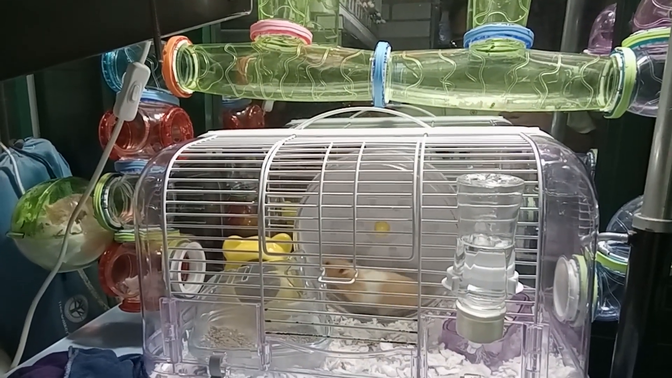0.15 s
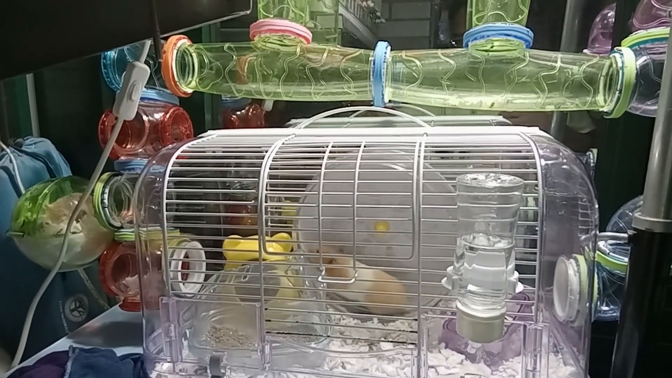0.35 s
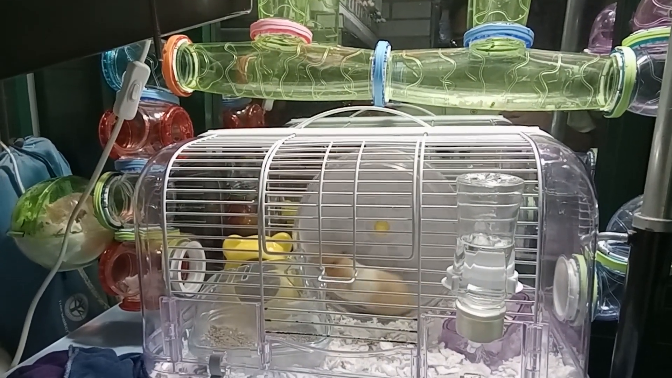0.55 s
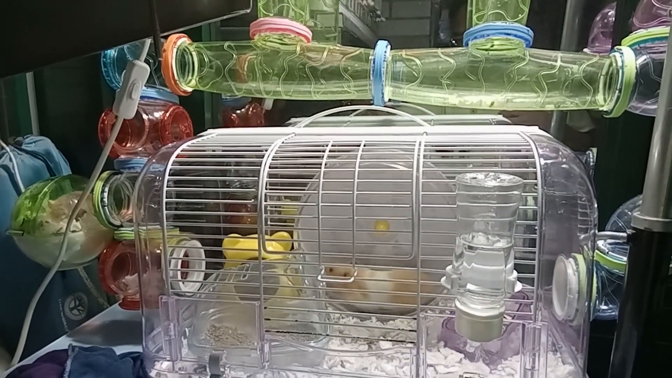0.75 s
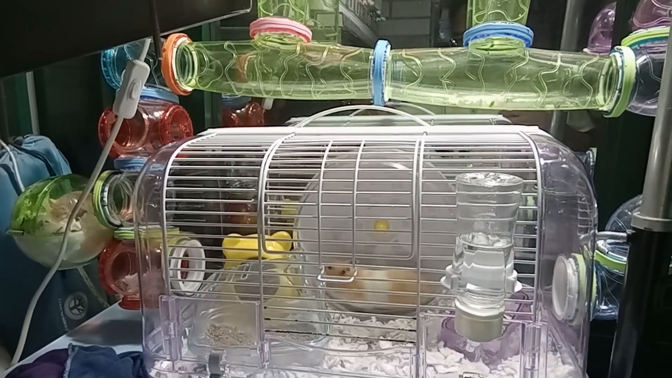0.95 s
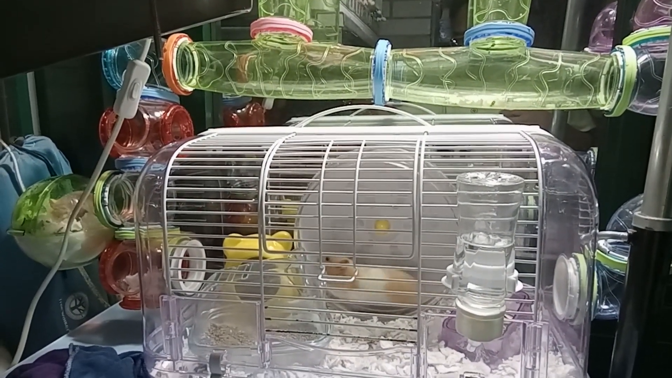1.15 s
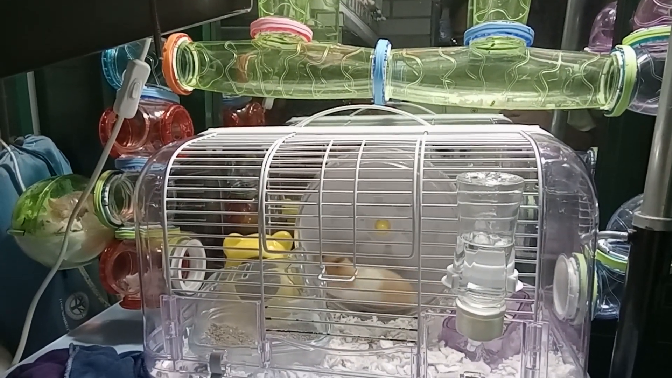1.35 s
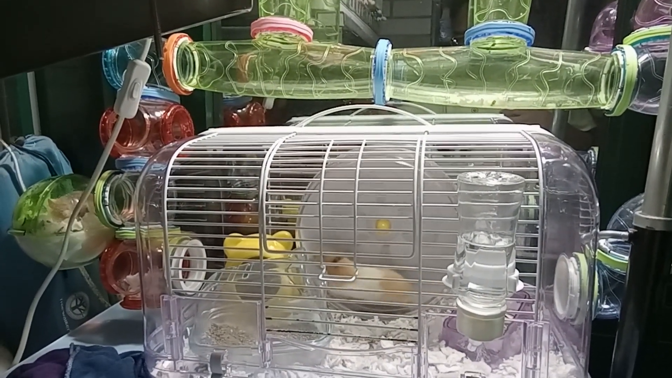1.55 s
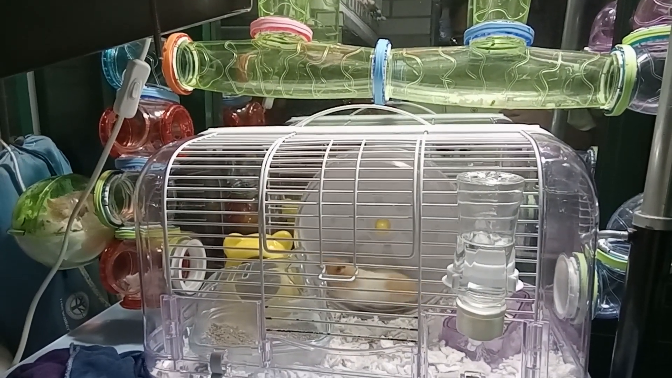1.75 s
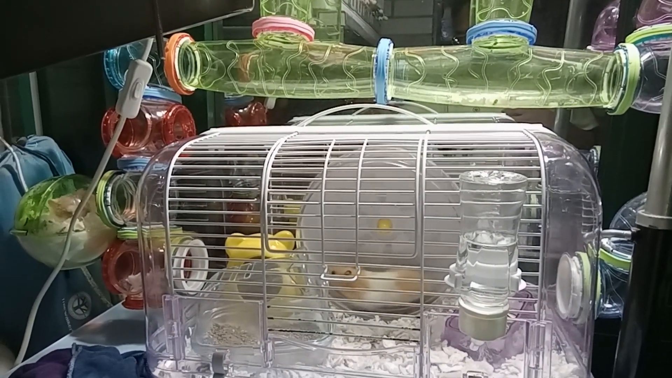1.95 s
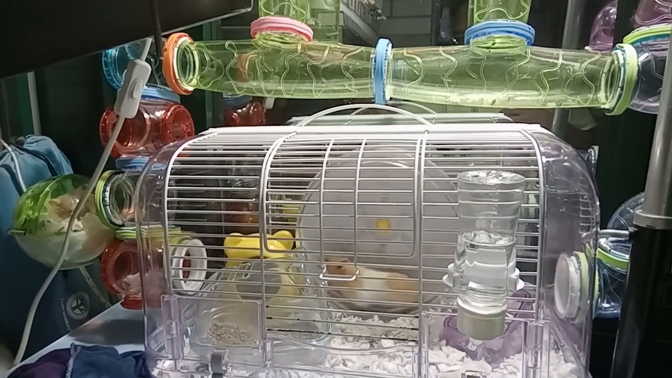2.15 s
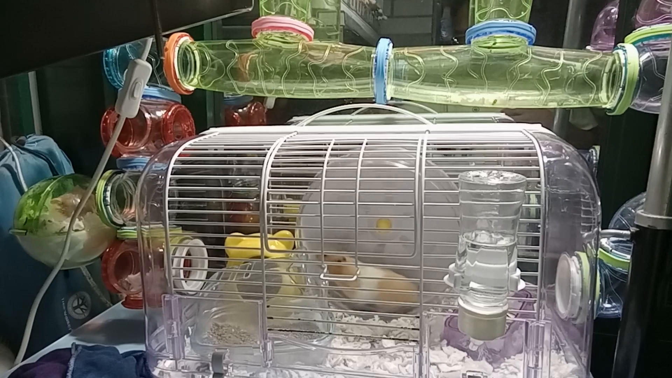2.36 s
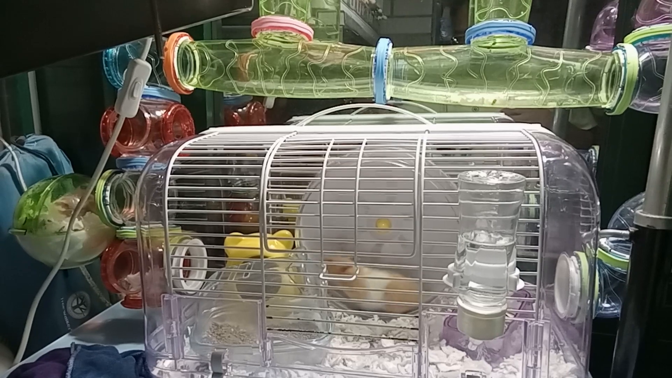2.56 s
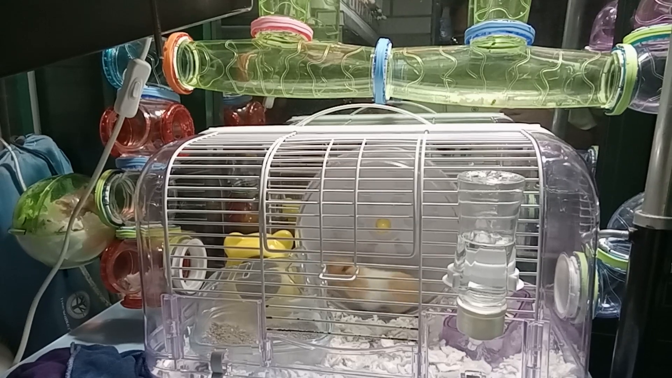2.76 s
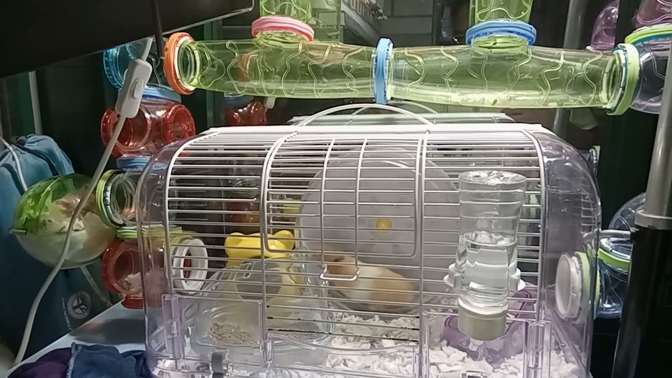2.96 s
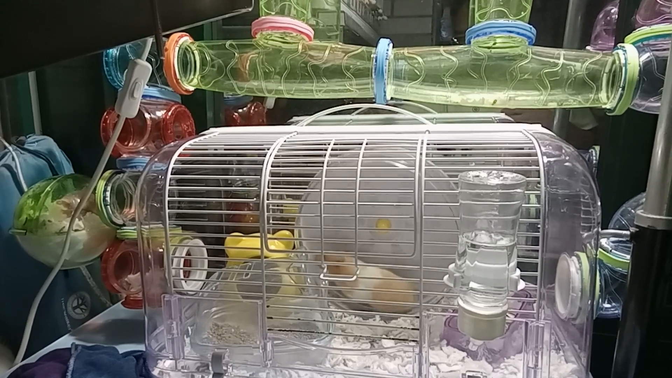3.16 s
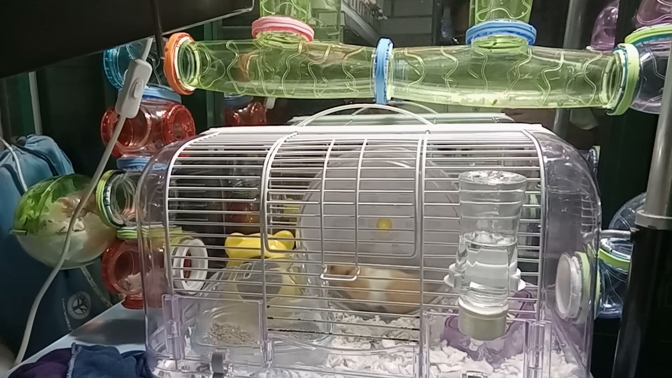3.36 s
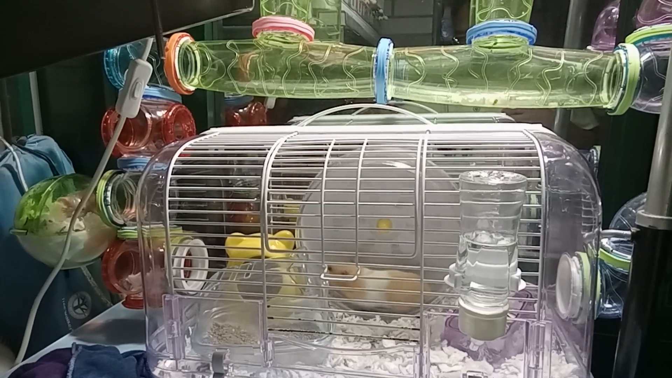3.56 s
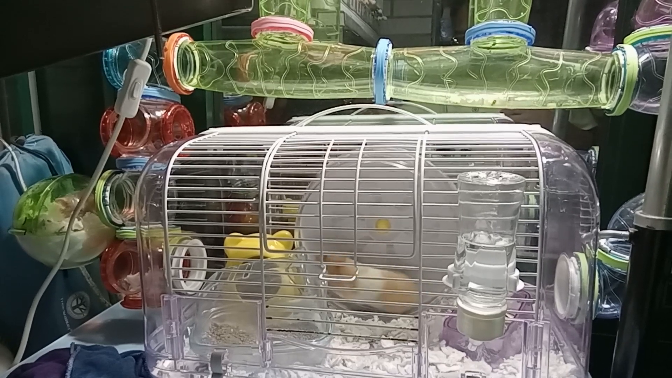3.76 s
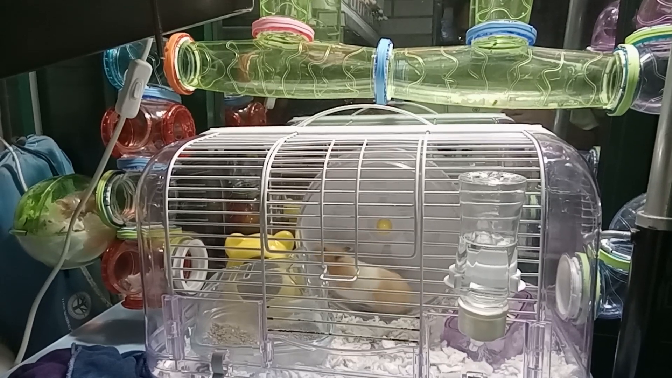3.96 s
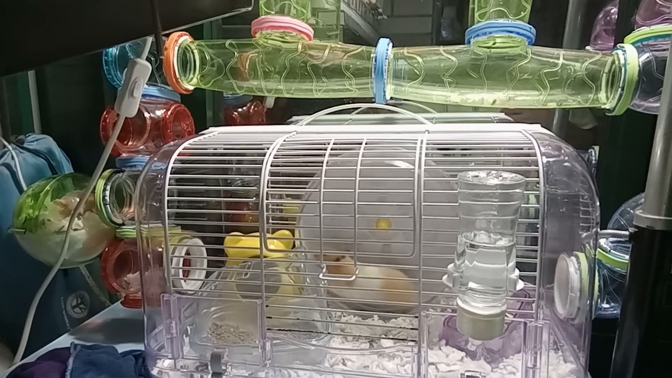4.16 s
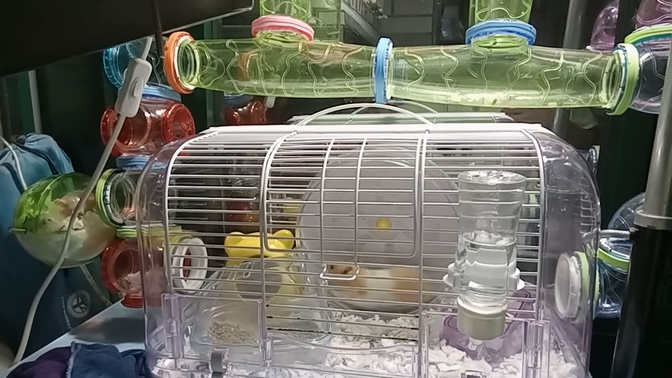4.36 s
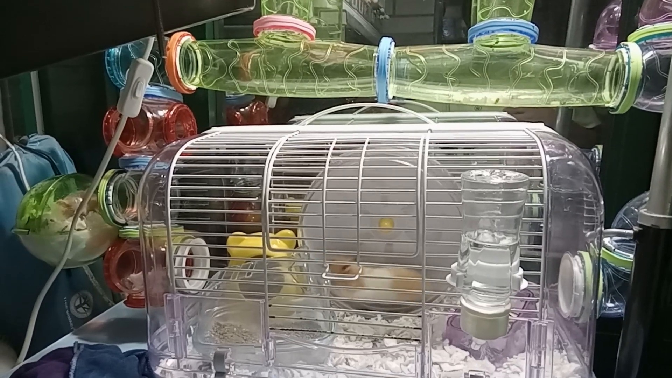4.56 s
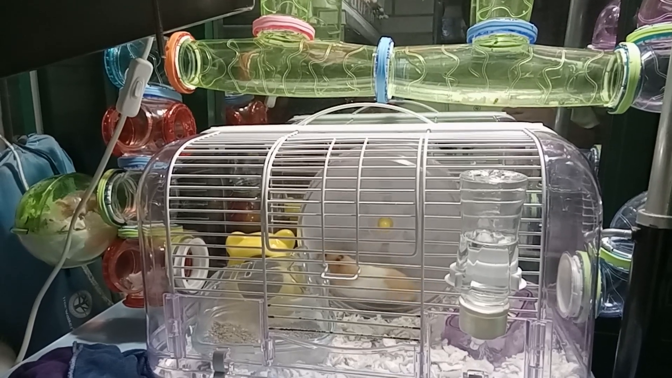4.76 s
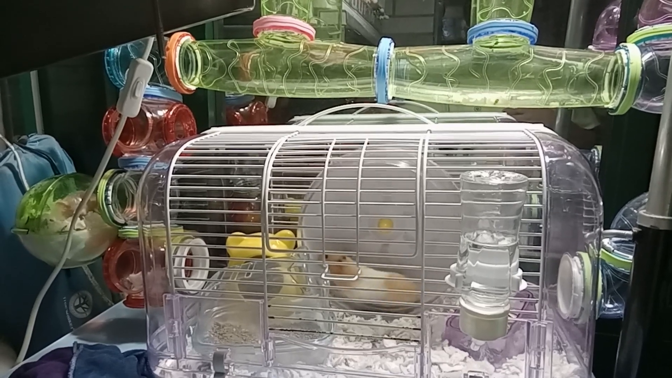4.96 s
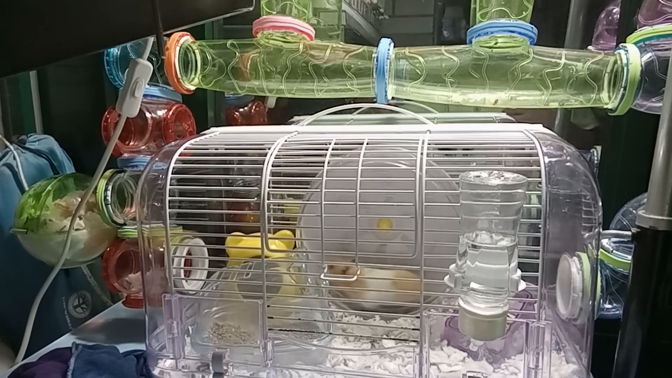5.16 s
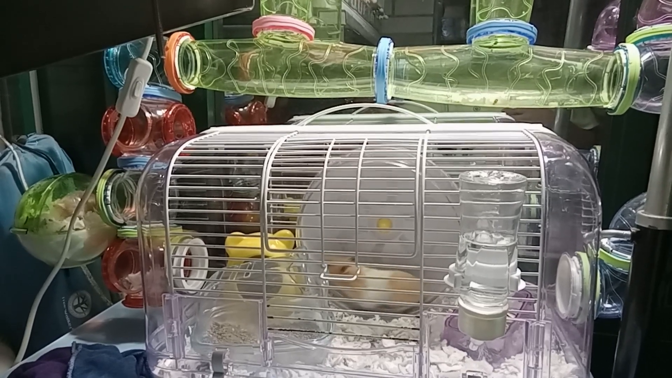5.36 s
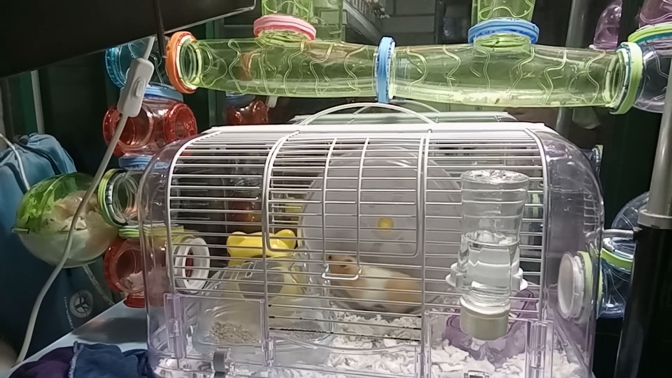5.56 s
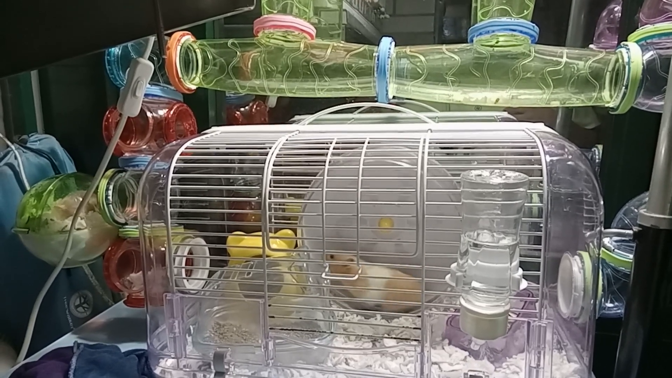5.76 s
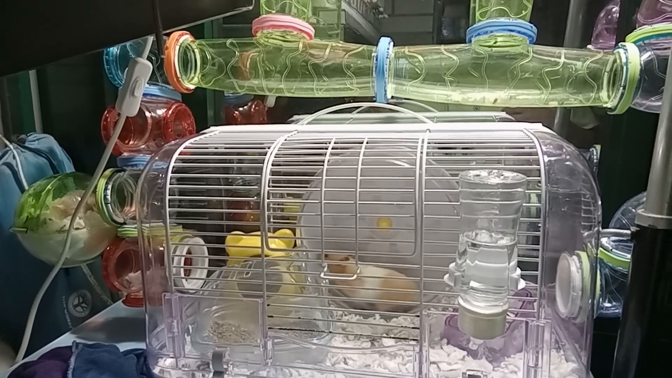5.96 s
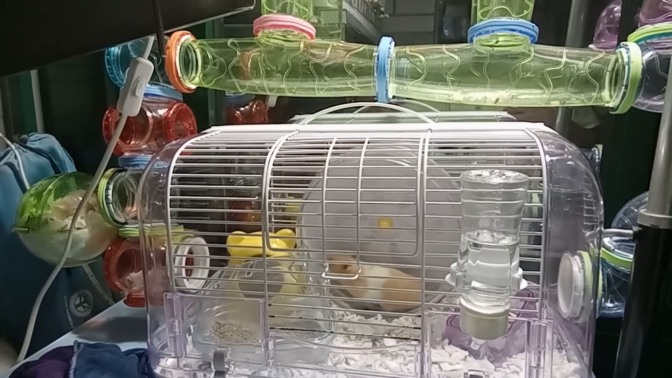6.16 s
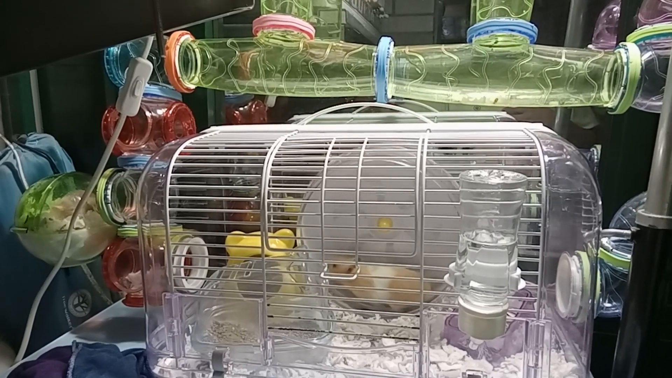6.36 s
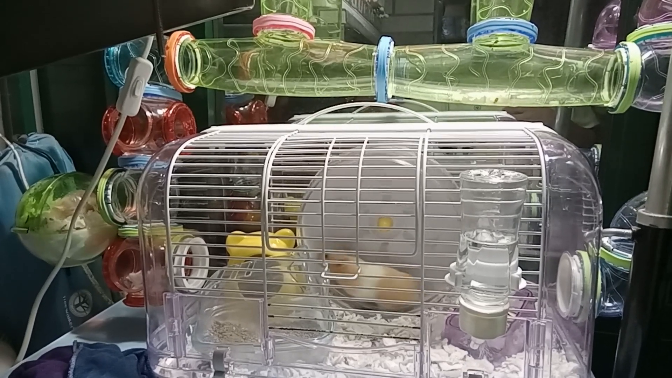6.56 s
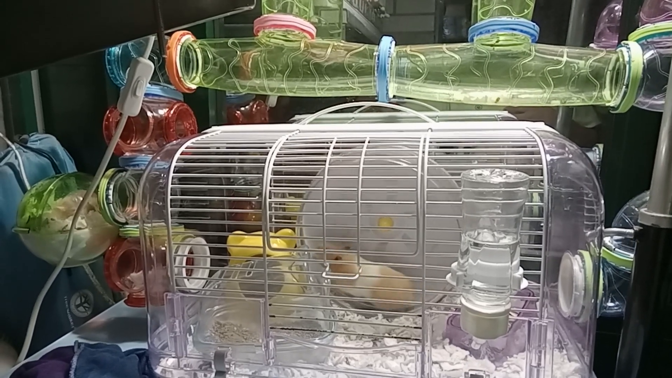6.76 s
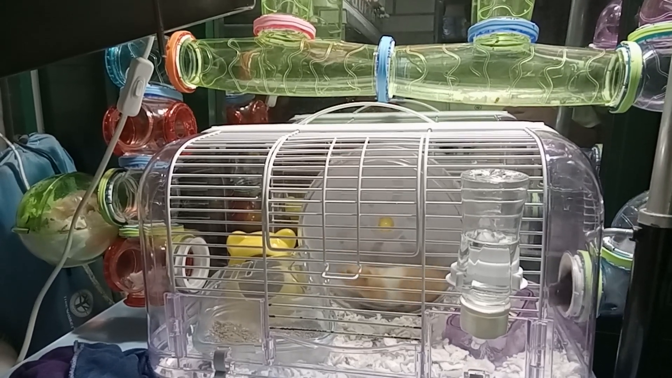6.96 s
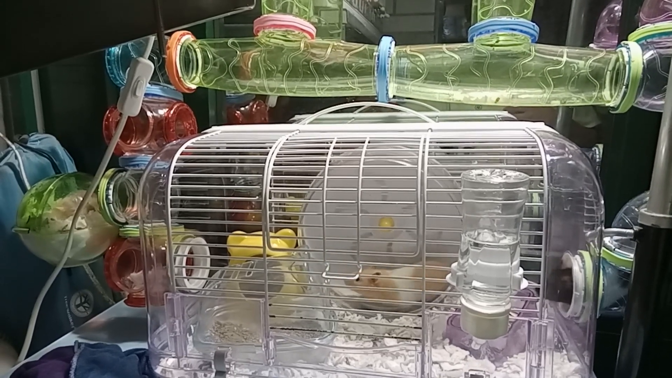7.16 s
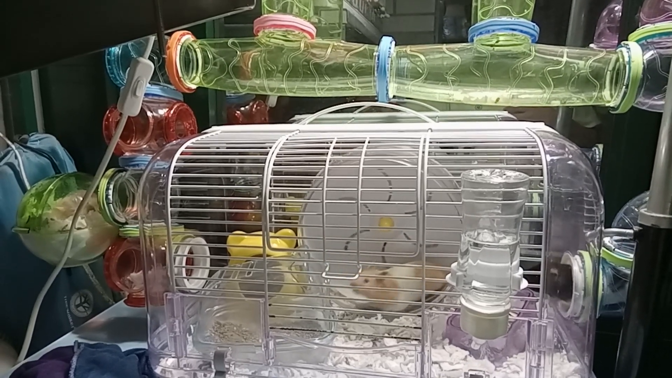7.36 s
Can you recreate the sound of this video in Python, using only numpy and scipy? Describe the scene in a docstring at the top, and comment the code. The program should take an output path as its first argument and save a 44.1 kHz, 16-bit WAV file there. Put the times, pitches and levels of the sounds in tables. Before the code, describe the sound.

Fast, uneven plastic clatter of a small rodent's exercise wheel knocking on its axle in a wire cage, then abruptly ceasing.

```python
"""A small room, with a wire and plastic cage in it where a hamster runs in a plastic wheel; one microphone channel.
Each footfall throws the loose wheel against its axle: a thud of the cage, a clack of the drum, a sharp tick,
then a weaker rebound. These are noise echoes with quick decays over a slower tail, shaped by resonances.
Between them the drum chatters in short runs, the axle pings and the rolling wheel rumbles with small taps.
Near the end the footfalls cease and the rumble sinks into the filtered noise of the quiet room."""
import sys
import numpy as np
from scipy import signal
from scipy.io import wavfile

SR = 44100
rng = np.random.default_rng(int(sys.argv[2]) if len(sys.argv) > 2 else 0)


def bounce(signal):
    """Save signal as a 16-bit WAV file at the path given by the first command-line argument."""
    frames = np.transpose(np.atleast_2d(signal))
    limited = np.clip(frames, -1, 1)
    pcm = np.round(limited * 32767).astype(np.int16)
    wavfile.write(sys.argv[1], SR, pcm)


N = 327209

# Levels in the tables are relative: each source sets its own balance on top of them.
# Air of the room. Each row: frequency in Hz, level in dB per Hz.
AIR_SPECTRUM = [(25, -18), (60, -30), (110, 9), (170, 0), (450, -37), (700, -15), (1400, -32), (3300, -29),
                (4000, -20.5), (5000, -41), (7000, -30), (8500, -39), (10000, -38), (16000, -37)]
# Rumble of the turning wheel, straight between points. Each row: time in seconds, level in dB.
ROLLING_LEVEL = [(0, -40), (.3, -47.5), (.8, -48), (1.45, -54.5), (2.3, -47.5), (3.4, -45.5), (4.3, -57.5),
                 (4.7, -44.5), (5.1, -48.5), (6.25, -47.5), (6.86, -50), (7.2, -49.5), (7.32, -58)]
# Spells in which the drum chatters. Each row: start in seconds, length in seconds, level in dB.
CHATTER_SPELLS = [(0, 0.14, -37), (0.715, 0.084, -38), (0.997, 0.045, -37.5), (1.185, 0.14, -41.5),
                  (1.658, 0.043, -37.5), (1.851, 0.12, -37), (2.461, 0.018, -37.5), (2.567, 0.04, -38),
                  (2.87, 0.054, -37), (3.156, 0.076, -36.5), (3.787, 0.058, -35), (4.101, 0.051, -40.5),
                  (4.283, .16, -36.5), (5.036, 0.077, -41), (6.35, 0.073, -43), (6.926, 0.088, -38.5)]
# The drum under a light bounce. Each row: frequency in Hz, level in dB per Hz.
BOUNCE_SPECTRUM = [(60, -31), (300, -6), (520, -20), (635, -8.5), (760, -1), (1300, -0.5), (2000, 0.5),
                   (2600, -3.5), (3300, -8), (4200, -14), (7000, -15.5), (16000, -53.5)]
# Low modes of the cage and its stand. Each row: frequency in Hz, width in Hz, level in dB.
CAGE_MODES = [(68.6, 5.4, -5), (88, 3.4, -18.5), (124.4, 11.6, -1), (128, 7.6, -10), (181.8, 5.8, 1.5),
              (230.5, 23.6, -5), (299.7, 31, -5), (338.7, 16, 2), (453, 35, -7), (487, 34, -5.5),
              (521.5, 6.1, -7)]
# Blows that set the axle ringing. Each row: start in seconds, level in dB, pitch in Hz.
AXLE_PINGS = [(1.159, -29.5, 5160), (1.827, -32, 5200), (3.613, -34, 5010), (4.274, -33, 5270),
              (4.358, -30, 5060), (5.474, -33.5, 5220), (6.341, -32, 5140), (6.9145, -27, 5150)]
# Modes of the axle. Each row: multiple of the pitch, width in Hz, level in dB.
AXLE_MODES = [(1, 190, 6), (.975, 260, -2), (1.974, 340, -7.5)]
# Footfalls that knock the wheel against its axle, about eleven a second.
# Each row: start in seconds, tick level in dB, clack level in dB.
FOOTFALLS = [(0.0014, -34, -30), (0.0204, -29, -29.5), (0.0479, -30, -33.5), (0.155, -23, -31),
             (0.2374, -29, -32), (0.3477, -31.5, -34), (0.4057, -50, -38), (0.5174, -20, -26),
             (0.5825, -26.5, -28.5), (0.6907, -19.5, -26.5), (0.7672, -29, -34), (0.8961, -34, -35.5),
             (0.9794, -19.5, -29), (1.076, -21.5, -26), (1.1565, -22.5, -29), (1.2479, -19.5, -28.5),
             (1.332, -36, -37), (1.4542, -35, -36), (1.5376, -30, -34), (1.6429, -21, -27.5),
             (1.7384, -34, -34), (1.8253, -19.5, -26.5), (1.9071, -22.5, -29), (2.0374, -47, -41.5),
             (2.0954, -25.5, -29.5), (2.2082, -33.5, -40), (2.2773, -34.5, -36.5), (2.3817, -22.5, -26.5),
             (2.4589, -32, -33), (2.5602, -20.5, -27), (2.636, -35.5, -38), (2.6862, -33.5, -43.5),
             (2.788, -33, -35), (2.8642, -22, -31), (2.9699, -25, -28.5), (3.0339, -39, -36),
             (3.1379, -25.5, -29.5), (3.1691, -28.5, -34.5), (3.2015, -32, -37), (3.3209, -20, -28.5),
             (3.4384, -31.5, -36), (3.5356, -31, -38), (3.6117, -25.5, -28), (3.707, -23.5, -26.5),
             (3.7758, -22.5, -30.5), (3.8931, -36, -43.5), (3.9783, -25, -31.5), (4.0861, -28, -33.5),
             (4.1806, -40.5, -42), (4.2721, -19, -29.5), (4.3582, -21.5, -28.5), (4.4458, -27, -34.5),
             (4.5403, -32, -35.5), (4.6482, -31, -34.5), (4.7243, -30.5, -33), (4.834, -19.5, -27),
             (4.8947, -34.5, -33.5), (5.003, -21.5, -27.5), (5.0339, -21.5, -31.5), (5.2018, -23.5, -32.5),
             (5.2887, -24, -28.5), (5.391, -32.5, -33.5), (5.471, -23, -27), (5.5732, -24.5, -29),
             (5.6597, -39.5, -36), (5.7663, -21, -27.5), (5.8571, -21.5, -30), (5.9803, -30.5, -38.5),
             (6.044, -23.5, -28), (6.1501, -28, -29), (6.2396, -26.5, -32), (6.342, -20, -26),
             (6.4306, -26.5, -31), (6.557, -33, -36.5), (6.6253, -19.5, -27.5), (6.7396, -29.5, -33.5),
             (6.913, -19, -27.5), (6.9519, -24, -32), (7.036, -35.5, -35.5), (7.2583, -38.5, -48)]
# The hard edge of the contact. Each row: frequency in Hz, level in dB per Hz.
TICK_SPECTRUM = [(500, -41), (2000, 0), (3200, -2.5), (4200, -7.5), (5200, -2.5), (6200, -4), (7100, -3.5),
                 (8000, 0.5), (8700, 2.5), (9400, -10.5), (10500, -14.5), (11500, -18.5), (16000, -24.5)]
# The snap of a hard blow. Each row: frequency in Hz, level in dB per Hz.
SNAP_SPECTRUM = [(2000, -53), (5000, 0.5), (7000, -5.5), (8400, 5), (9000, 0.5), (10200, -15), (16000, -28)]
# Broad response of the drum to a full blow. Each row: frequency in Hz, level in dB per Hz.
CLACK_SPECTRUM = [(60, -30.5), (250, -5.5), (450, -0.5), (560, 0), (635, -9.5), (730, 2), (1100, 2.5),
                  (1650, -0.5), (2100, -2), (2600, -4), (3300, -7.5), (4200, -16), (7000, -27.5),
                  (16000, -50)]
# Resonances of the plastic drum. Each row: frequency in Hz, width in Hz, rise in dB over its broad response.
DRUM_RESONANCES = [(737, 35, 5.5), (807, 26, 6), (882, 32, 4.5), (958, 41, 7), (1052, 16, 6.5),
                   (1161, 13, 5), (1298, 82, 6), (1506, 28, 6.5), (1596, 23, 5.5), (1748, 53, 4),
                   (1834, 85, 10.5), (1943, 120, 6), (2000, 80, 0), (2210, 51, 6.5), (2354, 95, 5),
                   (2650, 175, 4.5)]

AIR_DB = -57
WIRES_DB = -26  # below the wheel
ROLL_SAG_DB_PER_S = 20.5  # the rumble quietens while it waits for the next hard stride
BOUNCES_PER_S, BOUNCE_T60_S = 85, 0.035
SNAP_T60_S = 0.013
LEAD_S, LEAD_DB = 0.0052, -17  # a light first touch comes just before each full blow
RIM_ECHO_S, RIM_SHARE = 0.0016, 0.44  # echo from the rim: longest round trip, relative amplitude
LIGHT_STEP_DB = -27.5  # a softer tick marks a light step, any other a hard stride
SCUFF_LEAD_S, SCUFF_SPREAD_S = 0.014, 0.0032  # in light steps the claws touch first
FULL_CLACK_DB = -27.5  # the clack of a full stride
THUD_DB, THUD_GROWTH = -38, 0.6  # thud of a full stride; dB of thud per dB of clack
REBOUND_S, REBOUND_SPREAD_S = 0.039, 0.005  # the wheel falls back once after each footfall
REBOUND_TICK_DB, REBOUND_CLACK_DB, REBOUND_THUD_DB = -15.5, -12.5, -15  # relative to the footfall
CLAWS_PER_S, CLAW_SPREAD_DB = 1.5, 1  # stray claw taps; level spread of all claw taps
CLAW_TICK_DB, CLAW_CLACK_DB, CLAW_THUD_DB = -45.5, -45, -62.5
STOP_S = 7.2  # no claw taps after this
EDGE_HZ = 16200


def gain_of(db):
    """Amplitude factor for a level in dB."""
    return 10 ** (np.asarray(db) / 20)


def evened(x):
    """Scales to rms 1."""
    return x / np.sqrt(np.mean(x ** 2) + 1e-20)


def read(points, hz):
    """A spectrum in dB, straight between its points on a log axis."""
    f, db = np.transpose(points)
    return np.interp(np.log(hz + 1), np.log(f + 1), db)


def add(mix, s, sound):
    """Lays a sound into the mix at time s."""
    part = mix[max(round(s * SR), 0):][:len(sound)]
    part += sound[:len(part)]


def colour(x, points, bumps=(), size=8192):
    """Causal minimum-phase filter of unit energy: a broad response with resonances on top."""
    hz = abs(np.fft.fftfreq(size, 1 / SR))
    db = read(points, hz)
    for f, width, rise in bumps:
        db = db + rise / (1 + (2 * (hz - f) / width) ** 2)
    # the phase follows from the log magnitude
    response = np.exp(np.conj(signal.hilbert(np.log(gain_of(db)))))
    ring = np.fft.ifft(response).real[:size // 2]
    return signal.oaconvolve(x, ring / np.linalg.norm(ring))[:N]


def bursts(sizes, t60):
    """Turns single impacts into short bursts of noise with decaying power."""
    decay = np.exp(-2 * np.log(1000) / (t60 * SR))
    power = signal.lfilter([1], [1, -decay], sizes ** 2)
    return np.sqrt(power) * rng.standard_normal(N)


def scatter(times, levels_db, rise, t60, tail_db, tail_t60, alike, rim=0):
    """Each blow spreads into dense echoes: a quick decay in the plastic, a slower one in cage and room."""
    t = np.arange(SR // 3) / SR
    quick, slow = gain_of(-60 * t / t60), gain_of(tail_db - 60 * t / tail_t60)
    shape = (1 - np.exp(-t / rise)) * np.hypot(quick, slow)
    alike = np.clip(alike, 0, 1)  # share of the echo paths that stays the same as the wheel turns
    paths, out = rng.choice([-1., 1.], len(t)), np.zeros(N)
    for s, db in zip(times, levels_db):
        fresh = rng.choice([-1., 1.], len(t))
        echoes = np.where(rng.random(len(t)) < alike, paths, fresh)
        trip = round(RIM_ECHO_S * rng.uniform(0.5, 1) * SR)  # drawn anew for each blow
        add(out, s, gain_of(db) * shape * evened(echoes + rim * np.roll(echoes, trip)))
    return out


def with_first_touch(x):
    """The wheel brushes its stop a moment before it lands: a fainter, earlier copy."""
    early = np.interp(np.arange(N) + LEAD_S * SR, np.arange(N), x, right=0)
    return x + gain_of(LEAD_DB) * early


def room():
    """The still air of the room: steady noise, strongest in the lows."""
    return gain_of(AIR_DB) * colour(rng.standard_normal(N), AIR_SPECTRUM)


def wires(knocking, hz=519, t60=0.58):
    """The bars of the cage pick up the wheel's knocks and sing on faintly, a decaying tone after each."""
    t = np.arange(2 * SR) / SR
    ring = gain_of(-60 * t / t60) * np.sin(2 * np.pi * hz * t)
    singing = signal.oaconvolve(knocking, ring)[:N]
    return gain_of(WIRES_DB) * np.std(knocking) * evened(singing)


def rolling(per_s=300, spread_db=3):
    """Claws and axle give a stream of small random taps, fading after each hard stride."""
    sizes_db = np.minimum(spread_db * rng.exponential(1, N), 8)
    impacts = gain_of(sizes_db) * (rng.random(N) < per_s / SR)
    t = np.arange(N) / SR
    pushes = np.array([0] + [s for s, tick_db, _ in FOOTFALLS if tick_db >= LIGHT_STEP_DB])
    latest = np.maximum(np.searchsorted(pushes, t) - 1, 0)
    waited = t - pushes[latest]
    level_db = np.interp(t, *np.transpose(ROLLING_LEVEL)) - ROLL_SAG_DB_PER_S * waited
    return gain_of(level_db) * evened(bursts(impacts, t60=0.017))


def chatter(jitter=0.3, spread_db=0.5, count=24):
    """The drum bounces on its axle in quick, uneven runs, each bounce a burst with two decays."""
    impacts = np.zeros(N)
    for s, length, db in CHATTER_SPELLS:
        slip, size = rng.standard_normal((2, count))
        delays = abs(np.arange(count) + jitter * slip) / BOUNCES_PER_S
        fade = np.clip((length - delays) * BOUNCES_PER_S, 0, 1)  # ends the run over one bounce
        for delay, gain in zip(delays, fade * gain_of(db + spread_db * size)):
            add(impacts, s + delay, np.array([gain]))
    quick = gain_of(5.5) * bursts(impacts, t60=BOUNCE_T60_S)
    return quick + gain_of(2.0) * bursts(impacts, t60=0.084)


def blows():
    """All blows on the wheel, as rows (s, tick dB, clack dB, thud dB): footfalls, their rebounds, claw taps."""
    s, tick_db, clack_db = np.transpose(FOOTFALLS)
    rebound_slip, scuff_slip = rng.standard_normal((len(s), 2)).T
    thud_db = THUD_DB + THUD_GROWTH * (clack_db - FULL_CLACK_DB)
    feet = np.column_stack([s, tick_db, clack_db, thud_db])
    rebounds = feet + [REBOUND_S, REBOUND_TICK_DB, REBOUND_CLACK_DB, REBOUND_THUD_DB]
    rebounds[:, 0] += REBOUND_SPREAD_S * rebound_slip
    scuffs = (s - SCUFF_LEAD_S + SCUFF_SPREAD_S * scuff_slip)[tick_db < LIGHT_STEP_DB]
    strays = np.flatnonzero(rng.random(N) < CLAWS_PER_S / SR) / SR
    times = np.append(scuffs, strays)
    times = times[times < STOP_S]
    spread = CLAW_SPREAD_DB * rng.standard_normal((len(times), 1))
    claws = np.column_stack([times, spread + [CLAW_TICK_DB, CLAW_CLACK_DB, CLAW_THUD_DB]])
    return np.vstack([feet, rebounds, claws])


def cage(hits, bounces, taps, lag_s=0.00399):
    """A moment after each knock the push reaches the cage, whose low damped modes hum on between strides."""
    s, _, _, thud_db = np.transpose(hits)
    push = scatter(s + lag_s, thud_db + 3.5, rise=0.0025, t60=0.17, tail_db=-11.5, tail_t60=0.38, alike=0.082)
    for at, db in zip(s + lag_s, thud_db):
        add(push, at, np.array([gain_of(db + 25.5)]))  # a single sharp shove
    push = push + gain_of(-22.5) * bounces + gain_of(-8.5) * taps
    t, ring = np.arange(SR // 2) / SR, 0
    for hz, width, db in CAGE_MODES:
        decay = width * np.exp(-np.pi * width * t)
        ring = ring + gain_of(db) * decay * np.cos(2 * np.pi * hz * t)
    low = signal.oaconvolve(push, ring / np.linalg.norm(ring))[:N]
    return signal.sosfilt(signal.butter(2, [50, 650], "bandpass", fs=SR, output="sos"), low)


def axle(scrape_s=0.0045, rough=0.41):
    """A short, rough scrape sets the axle ringing, at a slightly different pitch each time."""
    t, out = np.arange(SR // 8) / SR, np.zeros(N)
    contact = np.exp(-(2 * t / scrape_s - 1) ** 4)
    for s, db, pitch in AXLE_PINGS:
        for multiple, width, level in AXLE_MODES:
            hz = multiple * pitch
            wander = np.cumsum(rng.standard_normal(len(t))) * rough * np.sqrt(hz / SR) / 2
            grip = np.exp(1j * wander)  # the roughness wanders the phase
            ring = signal.lfilter([1], [1, -np.exp(-np.pi * width / SR)], contact * grip)
            tone = (ring / abs(ring).max() * np.exp(2j * np.pi * hz * t)).real
            add(out, s, gain_of(db + level) * tone)
    echoes = rng.standard_normal(len(t)) * gain_of(-60 * t / 0.12)
    return out + gain_of(-6) * signal.oaconvolve(out, echoes / np.linalg.norm(echoes))[:N]


def ticks(hits, bounces, taps):
    """The bright edge of hard plastic meeting plastic; a short, high snap grows with the blow's hardness."""
    s, tick_db, _, _ = np.transpose(hits)
    strikes = scatter(s, tick_db - 6.0, rise=0.0024, t60=0.068, tail_db=-15, tail_t60=0.18,
                      alike=0.3, rim=RIM_SHARE)
    hardness_db = tick_db - tick_db.max()
    snaps = scatter(s, tick_db - 2.5 + 0.5 * hardness_db, rise=0.00009, t60=SNAP_T60_S,
                    tail_db=-20, tail_t60=0.05, alike=0.35, rim=RIM_SHARE)
    edge = with_first_touch(strikes) + gain_of(-16.0) * bounces + gain_of(-9) * taps
    return colour(edge, TICK_SPECTRUM) + colour(snaps, SNAP_SPECTRUM)


def drum(hits, bounces, taps):
    """The hollow clack of the resonant plastic drum; light bounces get a spectrum of their own."""
    s, _, clack_db, _ = np.transpose(hits)
    clacks = scatter(s, clack_db + 1.03, rise=0.0016, t60=0.1, tail_db=-7.5, tail_t60=0.23, alike=0.03)
    full = colour(with_first_touch(clacks) + taps, CLACK_SPECTRUM, DRUM_RESONANCES)
    return full + colour(bounces, BOUNCE_SPECTRUM, DRUM_RESONANCES)


def scene():
    """Room, cage and wheel, in one microphone channel."""
    bounces, taps, hits = chatter(), rolling(), blows()
    wheel = drum(hits, bounces, taps) + ticks(hits, bounces, taps) + axle()
    return (room() + wires(wheel) + cage(hits, bounces, taps) + wheel)[None]


def record(dry):
    """The upper band limit of the microphone channel, a steep low-pass."""
    lowpass = signal.firwin(511, EDGE_HZ, window=("kaiser", 9), fs=SR)
    return signal.oaconvolve(dry, lowpass[None], "same")


dry = scene()
out = record(dry)
bounce(out)
```